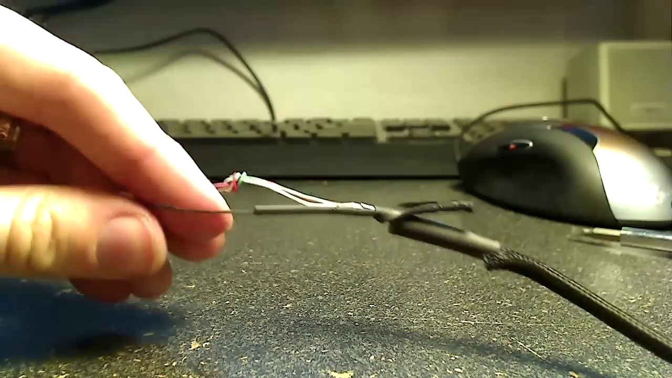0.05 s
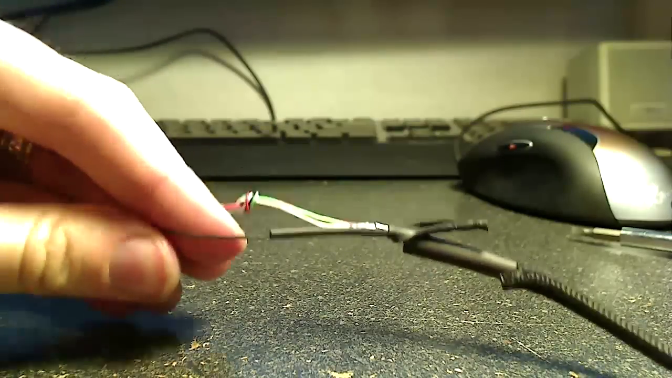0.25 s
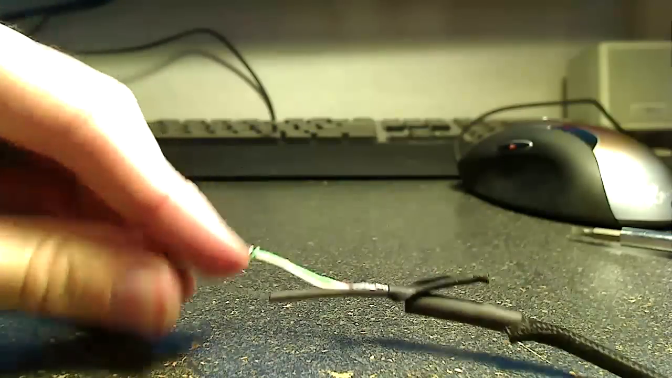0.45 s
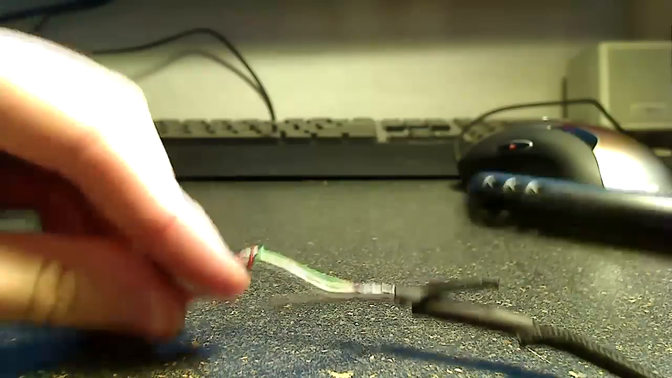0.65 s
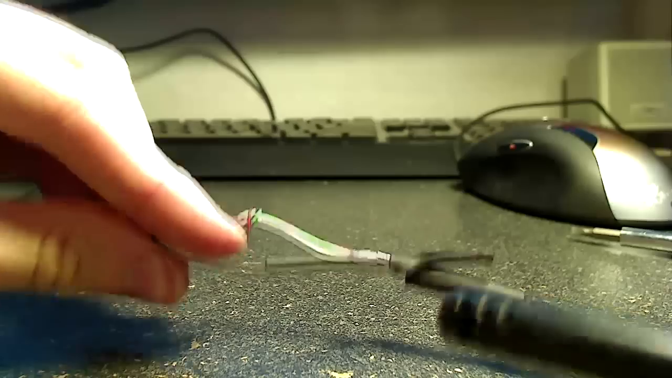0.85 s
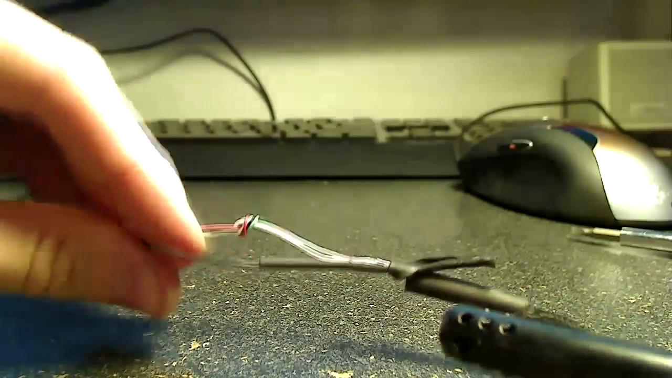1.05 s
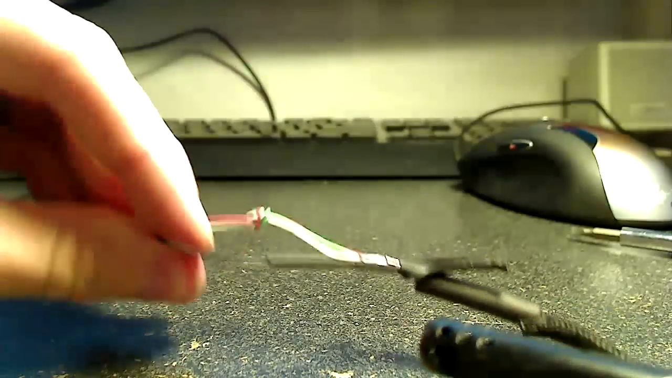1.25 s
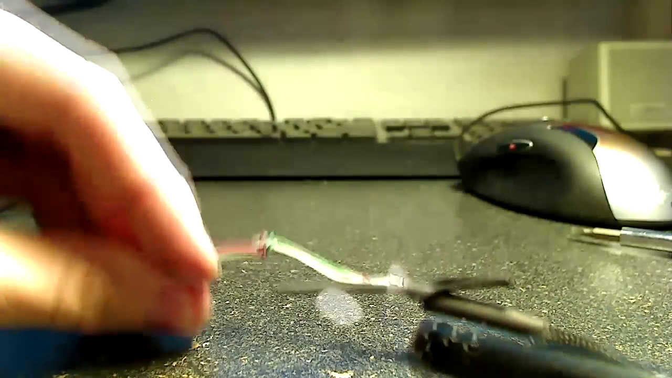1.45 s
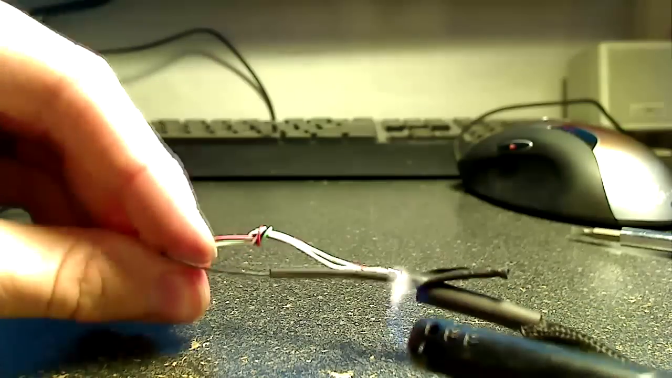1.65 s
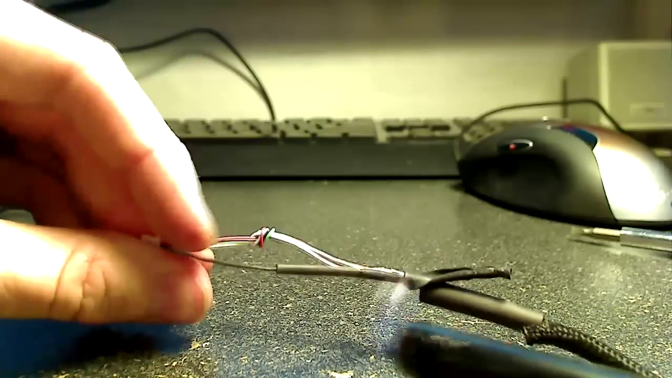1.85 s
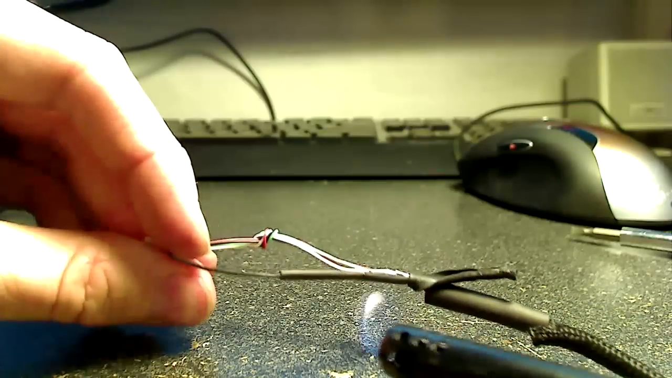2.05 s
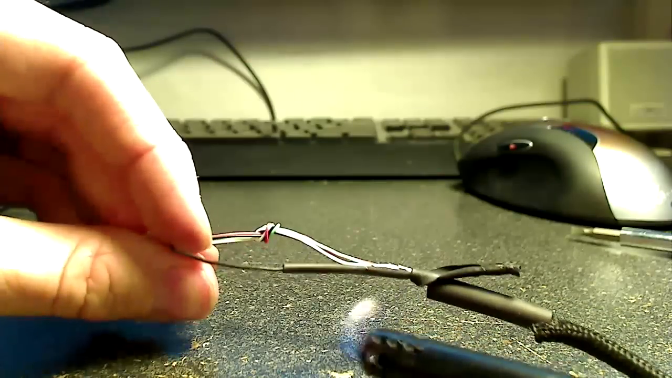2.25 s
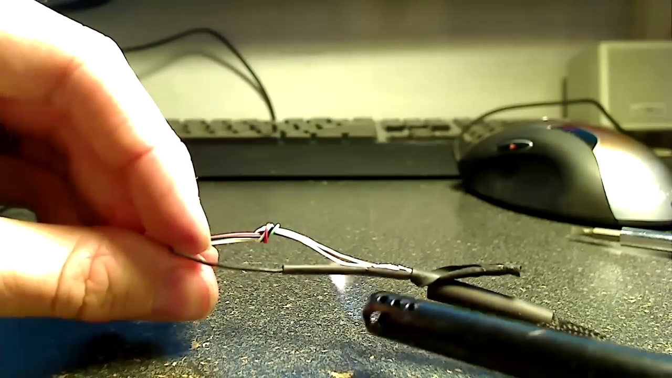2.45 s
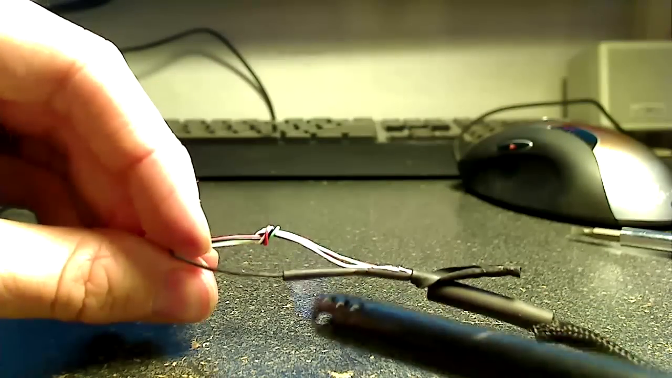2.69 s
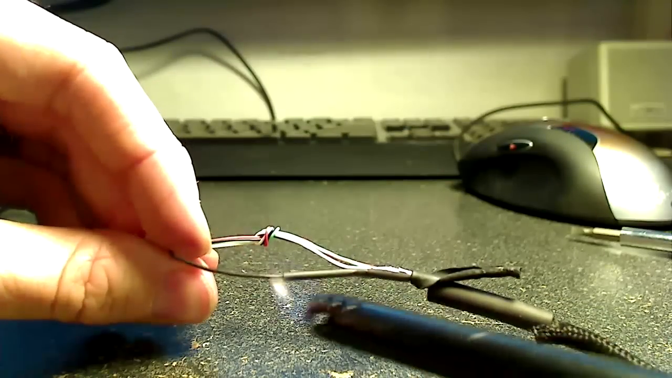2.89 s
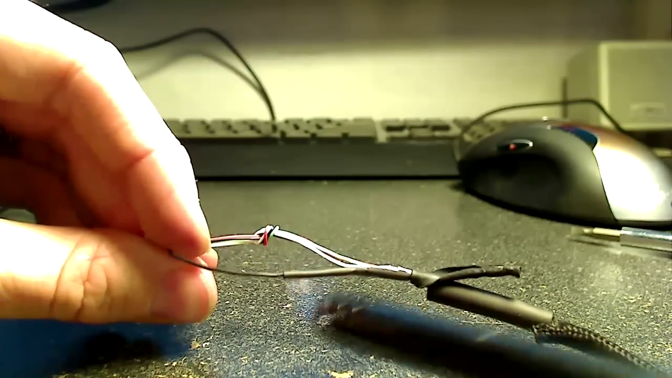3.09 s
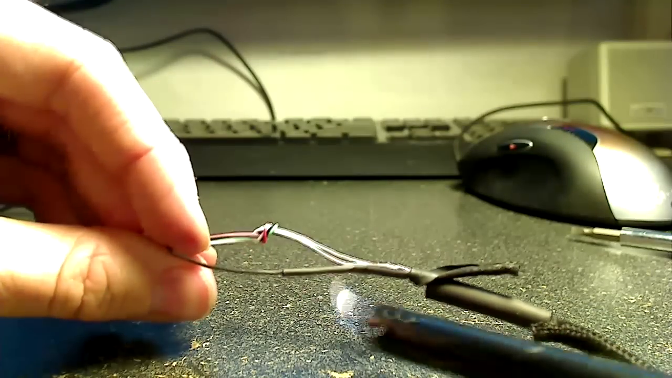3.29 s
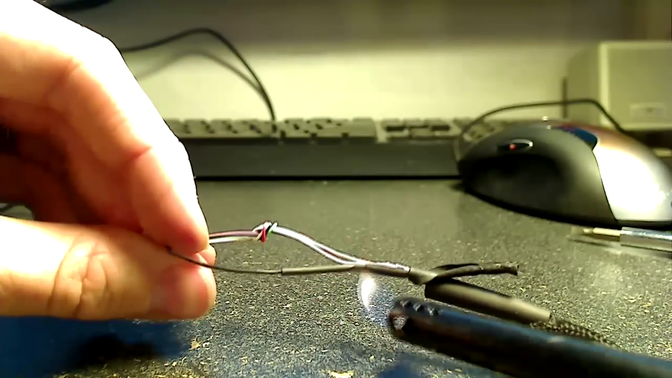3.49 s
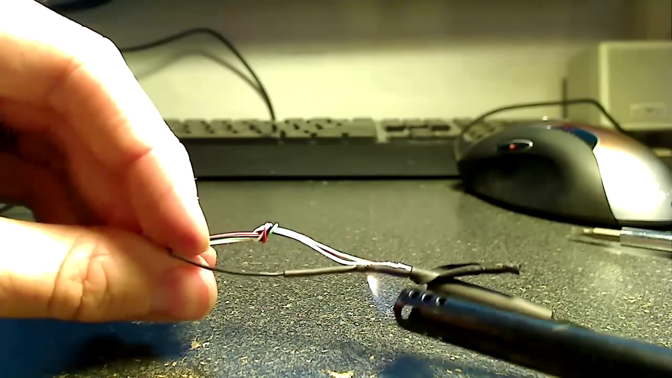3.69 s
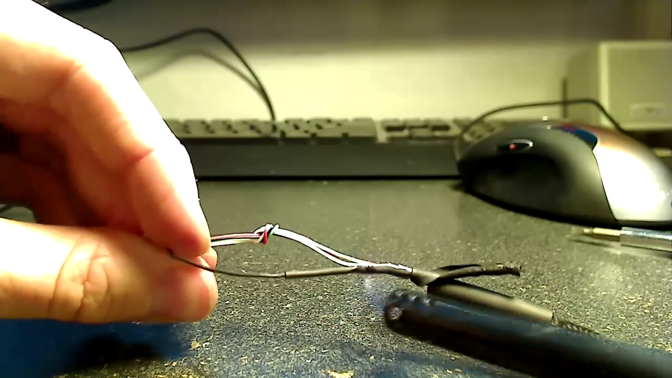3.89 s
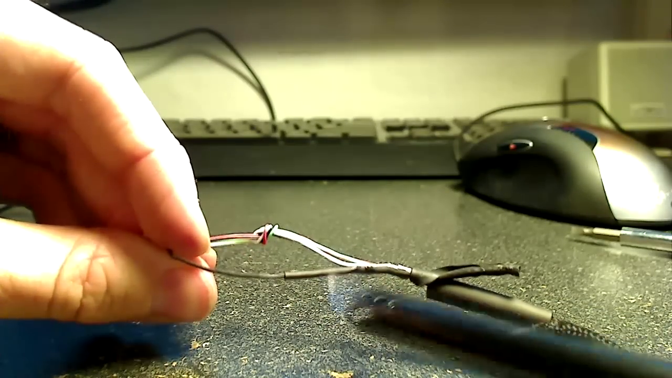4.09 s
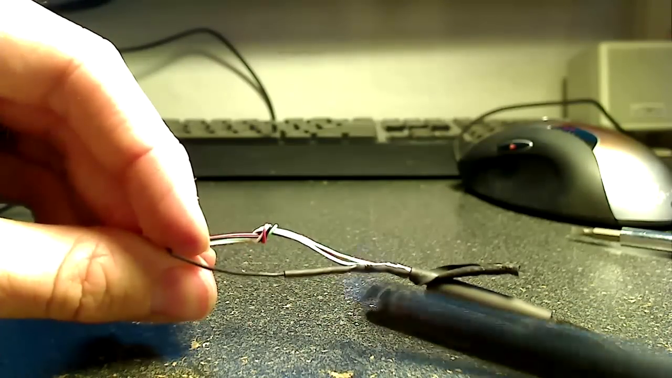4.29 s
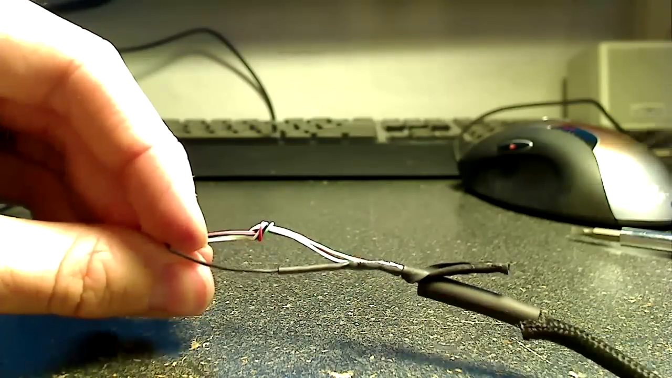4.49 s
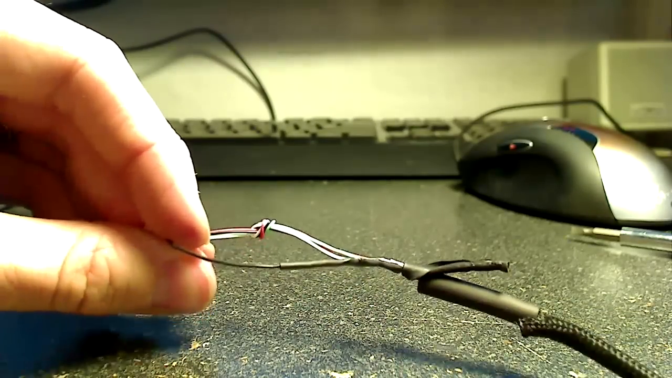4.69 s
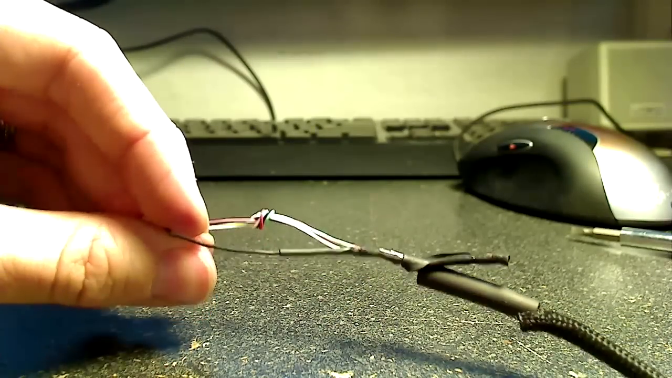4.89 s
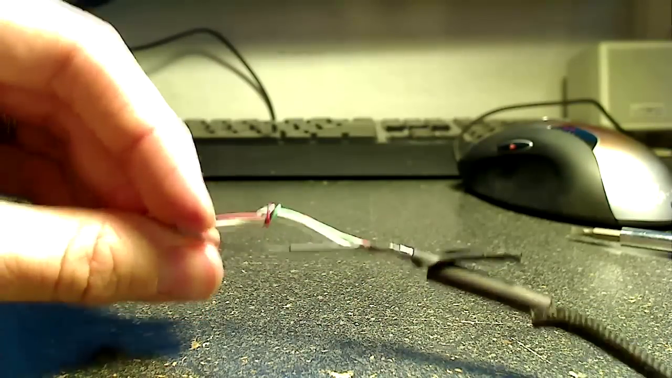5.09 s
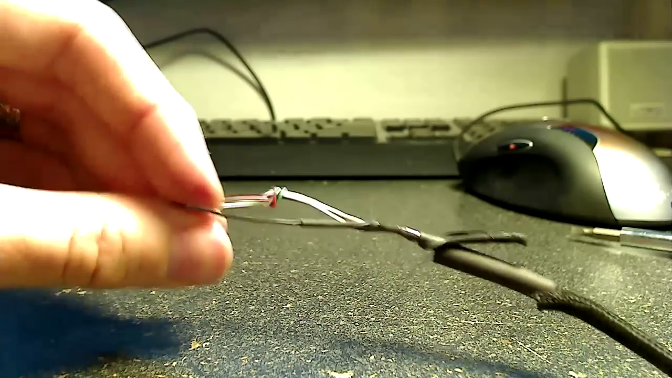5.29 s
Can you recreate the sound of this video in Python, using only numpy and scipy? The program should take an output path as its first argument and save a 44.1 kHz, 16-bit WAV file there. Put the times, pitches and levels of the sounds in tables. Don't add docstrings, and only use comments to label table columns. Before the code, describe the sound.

A quiet small room: soft steady hiss over a low uneven rumble, with a barely audible, fluttering electronic whine. The microphone sits close on the desk. From 0 to 0.5 s there are only faint touches and a light scrape. Between 0.63 and 1.47 s, brittle plastic ticks and rattles come in quick irregular clusters as a long lighter is handled, with soft low thumps from the hand on the desk. At 1.5 s the igniter snaps, the loudest event, bright and hard with a low jolt and short room echo. Then mostly quiet, with a click at 1.94 s, tiny creaks around 2.6 s, and a double tick at 3.34 s. Small rubs and ticks from 4.28 s lead to a sharp clack at 4.36 s as the trigger releases. Faint scratches follow around 4.6 s. At 4.95 s the lighter knocks firmly on the desk, then drags briefly with gritty clicks from 5.07 to 5.15 s.

```python
import sys
import numpy as np
from scipy import signal
from scipy.fft import rfft, irfft, next_fast_len
from scipy.io import wavfile
from scipy.ndimage import uniform_filter1d, map_coordinates

SR = 44100
rng = np.random.default_rng(int(sys.argv[2]) if len(sys.argv) > 2 else 0)


def rack_gain(trim_db):
    fader = np.asarray(trim_db, float)
    return 10 ** (fader / 20)


def generate_wav(sig):
    pcm = np.round(np.clip(np.atleast_2d(sig).T, -1, 1) * 32767).astype(np.int16)
    wavfile.write(sys.argv[1], SR, pcm)


N = 235708

# frequency in Hz, density in dB per Hz.
ROOM_SPECTRUM = [(15, -53), (25, -27), (119, -3), (215, 0.5), (368, -6.5), (482, -6.5), (1490, -20.5),
                 (1850, -23), (3000, -25), (3530, -30), (5010, -33), (7300, -37), (15500, -42)]

# base in Hz, start of the on-phase in frames, on share of a frame.
WHINE_A = (1830.3, -.08, .74)
WHINE_B = (2367.6, .12, .75)
# level in dB of multiple 1, 2, ..
HARMONICS_A = [-81.5, -90.5, -103, -93, -100, -101]
HARMONICS_B = [-101, -97, -99, -98.5, -100]

# start in seconds, blow in dB, shudder in dB, shudder in ms.
JOLTS = [
    (1.494, -21.5, -36.5, 44),
    (3.342, -57, -56, 18),
    (4.366, -58, -49.5, 10.7),
]
# frequency in Hz, width in Hz, level in dB.
STAND_MODES = [(73, 30, -11), (112, 75, -4), (157, 54, 0), (230, 98, -4.5), (342, 170, -10.5),
               (480, 65, -16.5)]
SWING_MODES = [(140, 160, -1.5), (263, 140, -0.5)]

# start in seconds, level in dB, length in ms.
DESK_HUMS = [(0.321, -68, 60), (.458, -65, 74), (.864, -61, 32), (1.034, -58.5, 36), (1.075, -52.5, 33),
             (1.152, -58, 26), (1.274, -55.5, 34), (1.68, -57.5, 39), (1.859, -60, 42), (2.316, -66, 53),
             (2.393, -56.5, 35), (2.669, -61, 24), (2.763, -62.5, 60), (3.03, -63.5, 24),
             (3.094, -59.5, 58), (3.184, -53.5, 17.4), (3.268, -59.5, 29), (3.563, -56, 27),
             (3.212, -56.5, 24), (4.056, -64, 26.6), (4.317, -57, 26), (4.371, -51, 25), (4.729, -60.5, 50),
             (4.786, -53.5, 49), (4.849, -61, 29), (5.092, -47, 14), (5.131, -55, 32), (5.175, -52, 20),
             (5.202, -61.5, 19), (5.256, -65, 32)]
# start in seconds, level in dB, pitch in Hz.
WRIST_BUMPS = [(.295, -59, 165), (0.808, -52, 145), (0.893, -54.5, 220), (1.961, -69, 200),
               (2.7, -60, 216.9), (2.868, -55, 201), (3.342, -63, 193), (3.383, -61, 155.3),
               (3.602, -55.5, 176), (3.716, -60, 200), (3.853, -61, 167), (5.278, -63.5, 176)]
# start in seconds, level in dB, pitch in Hz, length in ms.
DESK_KNOCKS = [(4.6361, -61, 2480, 14), (4.656, -68, 2520, 26), (.452, -66, 1480, 22), (1.94, -63, 450, 12),
               (.8261, -61, 524, 16), (3.342, -61, 710, 11), (4.36, -57, 710, 6.4), (4.371, -53.5, 466, 16)]

# frequency in Hz, width in Hz, level in dB.
IN_HAND = [
    [(1210, 440, -11.5), (1601, 250, -4.5), (2050, 180, 3.5), (2280, 300, -3)],
    [(2704, 220, -3), (2960, 130, 1.5), (3180, 210, -2), (3730, 820, -13)],
    [(4300, 1200, -3.5), (5930, 200, 1.5), (5960, 490, -6), (7897, 2400, -11)],
    [(9040, 840, -1), (11500, 1500, -6.5), (14300, 2000, -12)],
]
IGNITER = [
    [(610, 450, 0), (950, 500, -1)],
    [(2050, 400.7, 0), (3080, 670, -1.4), (3900, 720, -2.5)],
    [(4730, 360, -2), (5400, 485, -0.5), (6840, 4300, -6)],
    [(7900, 1000, 0), (10503, 4900, 6), (14600, 2400, -1)],
]
ON_DESK = [
    [(304, 89, -17.5), (560, 63, -2.5), (730, 160, -6.5), (1040, 230, -10.5), (1340, 400, -17)],
    [(1645, 170, -3), (1975, 120, -5.5), (2536, 360, 0), (3630, 440, -4)],
    [(4600, 2800, -7), (6280, 380, 2.5), (7730, 1600, -7.5)],
    [(8800, 340, 4), (10100, 850, -4), (12800, 3400, -5)],
]
SLIDING = [
    [(493, 180, 0), (1060, 290, -4), (1360, 330, -6)],
    [(1640, 320, -4), (2350, 390, -1), (3640, 430, -1)],
    [(4970, 1300, -10), (6000, 130, 3), (7530, 1000, -4.5)],
    [(8800, 980, -1), (10970, 3100, -6.5)],
]
TRIGGER = [
    [(2040, 730, 0)],
    [(2900, 260, 0), (3230, 390, -6.5)],
    [(4600, 1550, -15), (6110, 460, -2)],
    [(9400, 850, 0), (12100, 2500, -13)],
]
GRIPPED = [[(1387, 180, -2.5), (1610, 230, -1), (2260, 520, 0.5)]] + IN_HAND[1:2] + [ [(3920, 580, -5),
           (4900, 600, -6), (5770, 420, 0), (7600, 4900, -13.0)], [(9240, 1200, -5), (11400, 2000, -9.0),
           (14183, 2300, -12)]]
# own ring t60 in seconds, room level in dB, room t60 in seconds.
AFTER_SOUND = [
    (0.0065, -11, 0.069),
    (0.011, -13, .12),
    (0.01, -8.5, .11),
    (0.0055, -11.5, .095),
]
# level in dB, decay factor.
ROOM_SHARE = [
    (-2.5, 0.73),
    (0, 1),
    (0.5, 1),
    (-2.5, 0.96),
    (-6, 0.548),
    (-2, 0.83),
]

# start in seconds, shell in dB,
# second strike re first in dB, hollow re shell in dB, fizz re shell in dB.
TICKS = [(0.036, -66, -9, 6.5, -15), (0.6337, -52, 11.5, 1, -28), (0.7406, -56.5, 9, -11, -2),
         (0.7553, -50.5, 4, -16, -19), (0.8705, -57, 12.5, -6.5, -1), (.896, -49.5, -7, -9, -9),
         (0.9549, -45.5, -3, -4, -9), (1.009, -53.5, 0.5, -8, -11), (1.0746, -47, -3.5, 2, -4.5),
         (1.193, -43.5, -1.5, 5, -8), (1.2634, -49, 5, -4, -5), (1.3148, -38, -19, -6, -11.5),
         (1.3642, -42.5, -8, -4, -1), (1.4651, -58, 22, -3.5, -12), (1.9374, -44.5, -2, 3, -3),
         (3.3397, -41.5, -1, 4, -2), (4.282, -37.5, -7.5, -3.5, -9), (4.3496, -34, -4, 4, -5.5),
         (4.3586, -33, -19.5, 8, 6.5)]
# start in seconds, shell in dB, length in ms,
# hollow re shell in dB, fizz re shell in dB; the next three tables have the same columns.
RUBS = [(.052, -78, 23, -6, -8), (.317, -91.5, 20, 13, 13), (0.456, -64, 18, -8, -3),
        (0.656, -59, 24, -1, -20), (0.771, -54.5, 14, -6, -17), (0.793, -68, 14, 3.5, -16),
        (0.815, -69, 37, -6, -16), (.8835, -62, 4.9, 0, -4), (.911, -69, 22, -1, -24),
        (.9515, -54, 4.4, -9, -19), (0.972, -51.5, 2.5, -8, -30), (1.0257, -58, 4.9, 5.5, -4),
        (1.073, -47.5, 4.6, 1, -9.5), (1.1922, -56.5, 1.9, -19, 10), (1.213, -54.5, 6.9, 5.5, -9),
        (1.76, -84, 46, -3, -16.5), (4.275, -65, 6.7, -1.5, -17), (4.299, -55.5, 27, -2, -15),
        (4.33, -60, 3.3, 4, -26), (4.378, -57, 44, 0.5, -5.5), (4.6356, -55.5, 8.3, -13, -3),
        (4.643, -65.5, 24, -12, -16)]
SNAP = [
    (1.481, -47, 11, -11, -8.5),
    (1.49, -33, 7, -7.5, -7),
    (1.495, -12.5, 6.04, -12, 0.5),
    (1.5033, -23, 5.7, -16, -4.5),
    (1.511, -37, 10, -9.5, -3.5),
    (1.531, -53, 28, -2, 0),
    (1.55, -57, 37, -13, -7),
]
LAYING = [
    (4.938, -50.5, 14, 4, -9),
    (4.9465, -22.5, 5.6, 1, -8.5),
    (4.95, -31.5, 7.3, 4.5, -13),
    (4.956, -38.5, 2.5, 8.6, 6),
    (4.965, -43, 12.3, 3.5, -4.5),
    (4.971, -47, 24.4, 0.5, -6),
]
SLIDE = [
    (5.066, -63, 12, 2, -46),
    (5.075, -47, 2.5, -9, -43),
    (5.0798, -44.5, 2.3, 5, -41),
    (5.082, -50.5, 23, 0.5, -26),
    (5.091, -45, 15.7, 5, -10),
    (5.101, -45, 14, 3.5, -17),
    (5.112, -45.5, 8.4, 4, -3),
    (5.119, -55, 14, 6.5, -15),
    (5.13, -62, 21, 6.5, -16),
]
# start in seconds, shell in dB, length in ms,
# rattle re shell in dB, fizz re shell in dB.
SCRAPES = [(0.448, -68.5, 13, 14.5, -5), (.4662, -70, 11, -1, -10), (0.474, -61, 7, -4, 8),
           (.4815, -66, 4, 0, -16), (0.731, -66, 7.1, 3, -19), (0.784, -56.5, 12, 6, -8),
           (1.3233, -68, 3.1, -7, 8), (2.5843, -71, 5.7, -1, -28.5), (2.591, -72, 5.3, -0.5, -27),
           (4.336, -60, 20, -3, -38), (4.517, -80, 20.6, 10, 7.5), (4.527, -82.5, 9, 13.5, 10.5),
           (4.564, -86, 23, -4.5, 6.5), (4.609, -80, 9.1, 12, -6), (4.6155, -67, 4.3, 3, 3),
           (4.6196, -62, 7.6, 3, 5), (4.628, -66, 7, 6, 5), (4.7666, -67, 5.3, -11, -9)]
# start in seconds, shell in dB, length in ms.
CREAKS = [(2.585, -66, 12), (2.722, -70.5, 20), (3.802, -76, 18), (3.8367, -68.5, 16), (3.858, -72, 24),
          (3.909, -74, 14), (4.292, -54, 38), (4.322, -57, 18), (4.4, -62, 34)]
# hollow, rattle and fizz re shell, in dB.
CREAK_COLOUR_DB = (-9, -19, -34)
RATTLE_DB = (3, -2, 1, 7)

# start in seconds, peak in dB, pitch in Hz, t60 in ms.
PINGS = [(0.6438, -33.5, 3140, 15), (0.643, -49, 5706, 24), (0.7492, -38, 4370, 11), (.749, -42, 5560, 9.7),
         (.749, -51, 2200, 22), (0.762, -42, 2917, 39), (.7635, -47.5, 2030, 37), (.783, -51, 2930, 50),
         (.79, -59, 4900, 28), (.793, -59, 2930, 59), (0.8792, -41, 3010, 23), (0.8786, -37.5, 5000, 13),
         (0.878, -49.5, 1710, 27), (.897, -49, 2929, 25), (.9565, -45, 2010, 25), (0.956, -43, 2724, 20),
         (0.957, -44.5, 4310, 22), (.964, -38.5, 3050, 27), (.964, -44, 2020, 25), (.964, -44.5, 4360, 24),
         (0.971, -51, 2870, 18), (.972, -59, 4522, 20), (1.011, -48, 3100, 30), (1.0262, -45, 3130, 20),
         (1.0262, -50, 3854, 20), (1.0762, -31.5, 2840, 14), (1.0845, -36, 2890, 13),
         (1.193, -36, 2050, 24), (1.195, -34.5, 3000, 23), (1.2015, -55, 4600, 20), (1.2185, -47, 2907, 16),
         (1.218, -50, 5706, 22), (1.272, -47, 2700, 20), (1.272, -43, 2280, 20), (1.315, -38.5, 2230, 25),
         (1.315, -42, 5800, 23), (1.365, -35, 5660, 16), (1.366, -41, 3800, 15), (1.365, -39, 5920, 23),
         (1.473, -41, 2272, 20), (1.473, -43, 3600, 22), (1.496, -20, 4970, 15), (1.497, -22, 8670, 18),
         (1.496, -14, 3880, 16), (1.496, -21, 3180, 20), (1.502, -24, 2047, 37), (1.5048, -23, 3090, 25),
         (1.504, -35, 5512, 40), (1.52, -26, 183.5, 55),
         (1.9386, -30.5, 2050, 14.4), (1.939, -42.5, 6200, 20.5), (1.9395, -38, 2900, 14),
             (1.9462, -43, 2764, 30), (1.945, -47, 5970, 46), (3.3401, -42, 1679, 20),
             (3.341, -39, 2256, 20.4), (3.342, -42, 3900, 22), (3.342, -39, 5010, 22),
             (3.349, -44, 4970, 19), (3.3492, -31, 2155, 19.4), (3.352, -51, 5944, 55.4),
             (4.2825, -37.5, 2939, 30), (4.2826, -39, 4970, 26), (4.2828, -43, 1440, 25),
             (4.291, -43, 2936, 35), (4.291, -40.5, 2261, 20), (4.291, -43, 1410, 22),
             (4.303, -52, 2910, 120), (4.31, -61, 9570, 50), (4.3579, -13.5, 2080, 11),
             (4.358, -16, 1550, 13), (4.358, -17.5, 3020, 12), (4.358, -30, 8900, 16),
             (4.3593, -32, 9660, 20), (4.362, -20.5, 2290, 13), (4.366, -53, 5600, 30),
             (4.369, -43, 1960, 58), (4.373, -49, 9600, 116), (4.385, -49, 2800, 89),
             (4.518, -67.5, 3260, 50), (4.525, -66, 9400, 50), (4.613, -60, 6290, 52),
             (4.619, -54, 3348, 39), (4.621, -54, 9390, 29), (4.637, -49, 2520, 33), (4.652, -62, 5000, 50),
             (4.948, -22, 2566, 29), (4.948, -25.5, 8940, 20), (4.949, -28, 6210, 33),
             (4.949, -32, 3790, 24), (4.972, -43, 774, 95), (5.076, -38, 2120, 17), (5.076, -44, 2519, 18),
             (5.083, -35, 990, 30), (5.084, -42, 1800, 22), (5.0924, -35.5, 1600, 27),
             (5.0925, -34, 2080, 35), (5.112, -43, 5950, 34), (5.113, -41.5, 3580, 46),
         (1.4945, -22, 1000, 20), (1.4945, -27, 760, 22), (5.099, -53, 810, 24),
             (5.105, -42.5, 1030, 53), (5.128, -48, 710, 63), (5.0975, -42, 5997, 50),
             (4.66, -65, 2900, 41), (4.378, -50, 1500, 75), (4.395, -49, 1900, 46)]
# start in seconds, peak in dB.
CRACKS = [(.644, -39.5), (.749, -27), (0.8785, -27), (.9572, -40), (.9645, -38), (1.0263, -32.5),
          (1.077, -30), (1.1936, -31), (1.1964, -25), (1.272, -32), (1.316, -34), (1.365, -27),
          (1.473, -36), (1.9393, -26), (3.3426, -31), (3.3507, -31), (4.283, -32), (4.3493, -24),
          (4.3579, -12), (4.9471, -14.5), (4.637, -43), (5.0766, -37)]
# level in dB, pitch in Hz, t60 in ms.
CRACK_MODES = [(-3, 2300, 4.1), (-6, 5000, 3.4), (-10, 9000, 2.6)]


def unit(x):
    return x / np.sqrt(np.mean(x ** 2) + 1e-20)


def filtered(x, response):
    m = next_fast_len(N + SR // 2)
    return irfft(rfft(x, m) * response(np.fft.rfftfreq(m, 1 / SR)), m)[..., :N]


def ringing(x, modes):
    def response(f):
        h = 0
        for k, (centre, width, db) in enumerate(modes):
            band = 1j * f * width
            h = h + (-1) ** k * rack_gain(db) * band / (centre * centre - f * f + band)
        below = 1j * f / (0.51 * modes[0][0])
        above = 1j * f / (1.1 * modes[-1][0])
        h = h * below ** 2 / (1 + 2.1 * below + below ** 2)
        h = h / (1 + 1.2 * above + above ** 2) ** 2
        return h / np.sqrt(np.mean(abs(h) ** 2))
    return filtered(x, response)


def dying(power, t60):
    keep = rack_gain(-120 / (abs(t60) * SR))
    return signal.lfilter([1 - keep], [1, -keep], power)


def wobble(rate):
    knots = rng.standard_normal(int(N * rate / SR) + 4)
    return map_coordinates(knots, [np.arange(N) * rate / SR])


def room_tone():
    hz, db = np.transpose(ROOM_SPECTRUM)

    def colour(f):
        edge = .2 + .8 / (1 + (f / 12800) ** 80)
        return rack_gain(np.interp(np.log(f + 1), np.log(hz), db)) * edge

    def response(f):
        low = 1 / (1 + (f / 330) ** 4)
        return colour(f) * np.sqrt([low, 1 - low])

    noise = rng.standard_normal((2, N))
    noise[0] = unit(noise[0] * rack_gain(2.5 * wobble(14) + .8 * wobble(2)))
    noise[1] = unit(noise[1] * rack_gain(.5 * wobble(5)))
    return rack_gain(-68.5) * unit(filtered(noise, response).sum(0))


def whine(hz, start, share, harmonics_db):
    frame_hz, blank_leak = 24.582, .12
    t = np.arange(N) / SR
    gate = 1. * ((t * frame_hz - start) % 1 < share) + blank_leak
    gate = uniform_filter1d(gate, size=90) * rack_gain(1.5 * wobble(26))
    turns = rng.random(len(harmonics_db))
    lines = np.zeros(N)
    for k, db in enumerate(harmonics_db):
        lines += np.sqrt(2) * rack_gain(db) * np.sin(2 * np.pi * ((k + 1) * hz * t + turns[k]))
    return gate * lines


def stand():
    push, shake = np.zeros(N), np.zeros(N + SR)
    t = np.arange(SR // 8) / SR
    for s, blow_db, shudder_db, ms in JOLTS:
        push[round(s * SR)] = -rack_gain(blow_db + 24.0)
        shudder = rack_gain(shudder_db) * rng.standard_normal(len(t)) / (1 + (t * 1000 / ms) ** 8)
        shake[round(s * SR):][:len(t)] += shudder
    return ringing(push, SWING_MODES) + ringing(shake[:N], STAND_MODES)


def desk():
    middle_hz, middle_db, hz_per_db = 248.5, -58.5, 1.5
    bump_ms = 18
    out, t = np.zeros(N + SR), np.arange(SR // 4) / SR
    pushes = [(s, db, middle_hz + hz_per_db * (db - middle_db), ms) for s, db, ms in DESK_HUMS]
    pushes += [(*row, bump_ms) for row in WRIST_BUMPS]
    pushes += DESK_KNOCKS
    chance = rng.random((len(pushes), 2))
    for (s, db, hz, ms), (turn, sag) in zip(pushes, chance):
        u = t * 1000 / ms
        swell = (3.67 * u) ** 2.11 * np.exp(1.5 - 5.14 * u) * 0.85
        cycles = hz * t * (1 - 0.017 * sag * u) + turn
        out[round((s - .004) * SR):][:len(t)] += rack_gain(db) * swell * np.sin(2 * np.pi * cycles)
    return out[:N]


def loose_part_strikes():
    crossing_ms, strike_ms, shorter_per_db = 7.8, 4.5, 0.055
    rows = []
    for s, db, second_db, *colour in TICKS:
        for k in (0, 1):
            harder_db = max(0, (2 * k - 1) * second_db)
            ms = strike_ms * np.exp(-shorter_per_db * harder_db)
            rows.append((s + k * crossing_ms / 1000, db + k * second_db, ms, *colour))
    return rows


def finger_slips():
    longest_ms, fade_db_per_ms, scatter_db = 11, -0.2274, 3
    rows = []
    for (s, db, ms, *colour), luck in zip(RUBS, rng.standard_normal((len(RUBS), 12))):
        slips = int(np.ceil(ms / longest_ms))
        for k, at in enumerate(np.arange(slips)[:12] * ms / slips):
            level = db + fade_db_per_ms * at + scatter_db * luck[k]
            rows.append((s + at / 1000, level, ms / slips, *colour))
    return rows


def contacts():
    lit_s = 1.5
    rattle_per_fizz = 0.55
    scrape_hollow_db = -7
    rows = []
    held = loose_part_strikes() + finger_slips()
    for state, table in enumerate((held, SNAP, LAYING, SLIDE)):
        for s, db, ms, hollow_db, fizz_db in table:
            body = 5 if state == 0 and s > lit_s else state
            rattle_db = RATTLE_DB[state] + rattle_per_fizz * fizz_db
            rows.append((body, s, db, ms, hollow_db, rattle_db, fizz_db))
    for s, db, ms, *colour in SCRAPES:
        rows.append((4 if s > lit_s else 0, s, db, ms, scrape_hollow_db, *colour))
    return rows + [(4, *row, *CREAK_COLOUR_DB) for row in CREAKS]


def lighter():
    states = (IN_HAND, IGNITER, ON_DESK, SLIDING, TRIGGER, GRIPPED)
    force = np.zeros((6, 4, N + SR))
    t = np.arange(SR // 20) / SR
    for state, s, db, ms, hollow_db, rattle_db, fizz_db in contacts():
        rise = np.clip(t * 1000 / (.1 + .012 * ms ** 2), 0, 1)
        rise *= 1 + 0.18 * np.exp(-t / 0.00051)
        press = rise * rack_gain(-3 * t * 1000 / ms) / (1 + (t * 1250 / ms) ** 5)
        levels = rack_gain(db + np.array([[hollow_db], [0], [rattle_db], [fizz_db]]))
        force[state, :, round(s * SR):][:, :len(t)] += (press * levels) ** 2
    grit = rack_gain(2.1 * wobble(900))
    ragged = rack_gain(1.5 * wobble(120))
    near, far = np.zeros(N), np.zeros(N)
    for powers, groups, (share_db, factor) in zip(force[..., :N], states, ROOM_SHARE):
        for power, modes, (ring_t60, room_db, room_t60) in zip(powers, groups, AFTER_SOUND):
            echo_t60 = 0.84 * room_t60 * factor
            echo = dying(dying(dying(power, 0.0094), echo_t60), echo_t60)
            envelopes = np.sqrt([dying(power * grit, ring_t60), echo * ragged])
            direct, reflected = ringing(envelopes * rng.standard_normal((2, N)), modes)
            near += direct
            far += rack_gain(room_db + share_db) * reflected
    return rack_gain(-1.0) * (near + filtered(far, lambda hz: 1 / (1 + (hz / 11500) ** 6)))


def pings():
    crack_scatter = .15
    rise_cycles, flutter_db, steady_ms = 1.1, 4.5, 9
    out, t = np.zeros(N + SR), np.arange(SR // 8) / SR
    shifts = np.exp(crack_scatter * rng.standard_normal((len(CRACKS), len(CRACK_MODES))))
    rows = PINGS
    for (s, db), shift in zip(CRACKS, shifts):
        rows = rows + [(s, db + d, hz * k, ms) for (d, hz, ms), k in zip(CRACK_MODES, shift)]
    late = 1 - np.exp(-t * 1000 / steady_ms)
    for (s, db, hz, t60_ms), knots in zip(rows, rng.standard_normal((len(rows), 2, 90))):
        pace = 150 + hz / 20
        flutter, turn = [late * map_coordinates(k, [t * pace]) for k in knots]
        rise = 1 - np.exp(-t * hz / rise_cycles)
        decay = rack_gain(db - 60000 * t / t60_ms + flutter_db * flutter)
        out[round(s * SR):][:len(t)] += rise * decay * np.sin(2 * np.pi * hz * t + 1.3 * turn)
    return out[:N]


def scene():
    background = room_tone() + whine(*WHINE_A, HARMONICS_A) + whine(*WHINE_B, HARMONICS_B)
    return (background + stand() + desk() + lighter() + pings())[None]


def low_pass(x):
    return signal.sosfilt(signal.butter(12, 16700, fs=SR, output="sos"), x)


def record(dry):
    rounded = dry / (1 + abs(dry / .56) ** 4) ** .25
    mix = filtered(rounded, lambda hz: 1 / (1 + (hz / 16000) ** 80))
    return low_pass(mix)


dry = scene()
out = record(dry)
generate_wav(out)
```